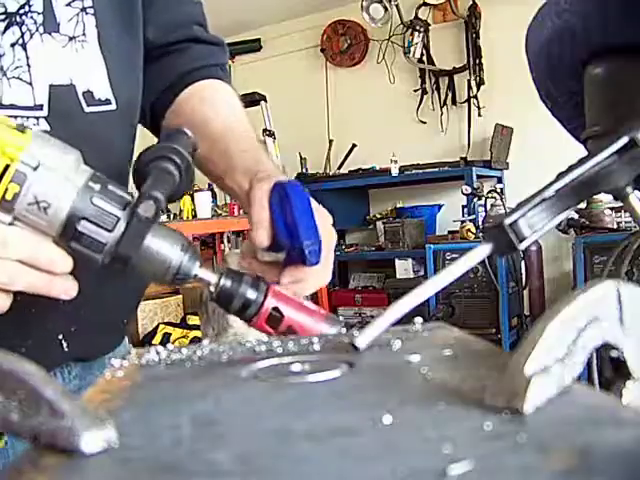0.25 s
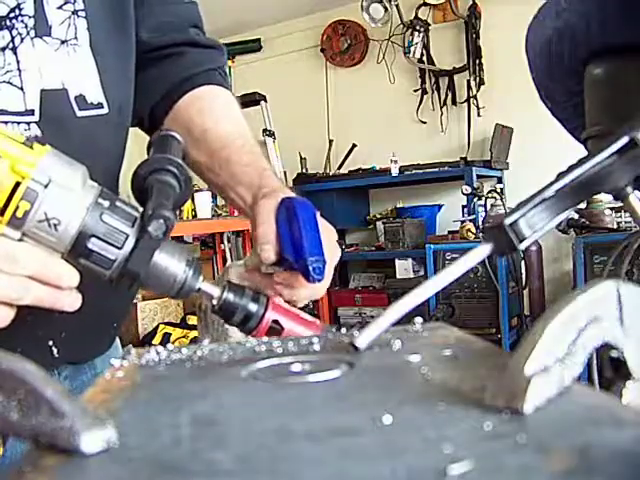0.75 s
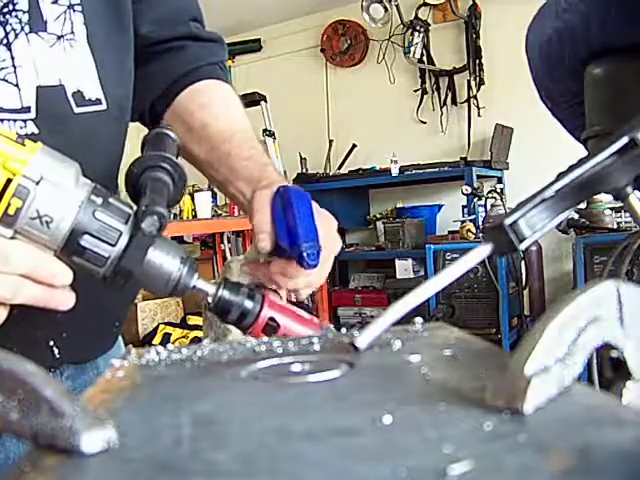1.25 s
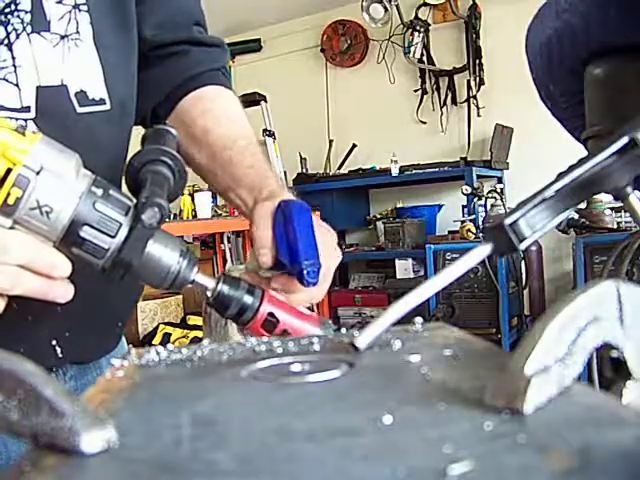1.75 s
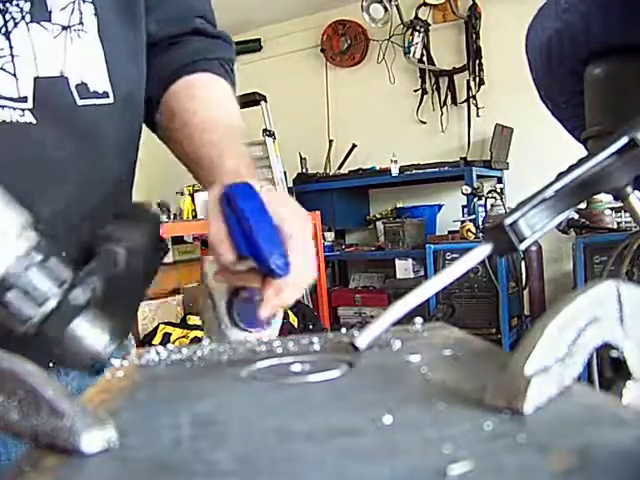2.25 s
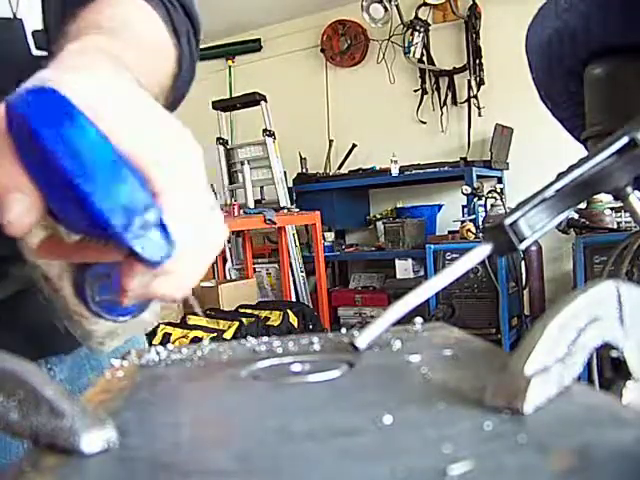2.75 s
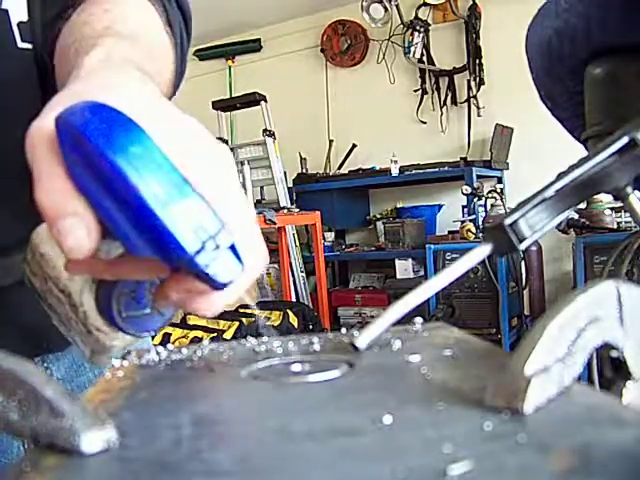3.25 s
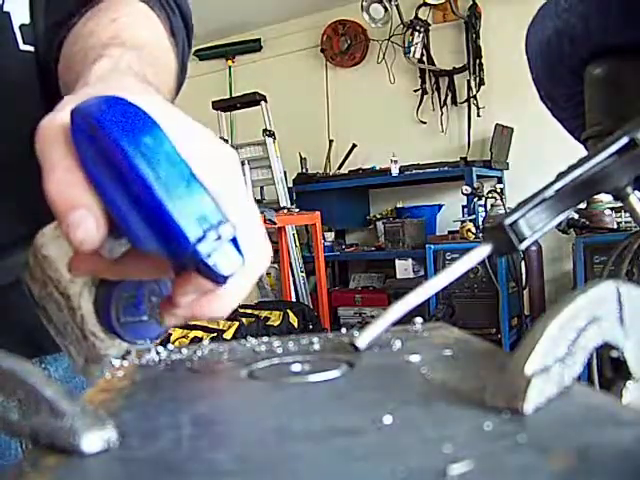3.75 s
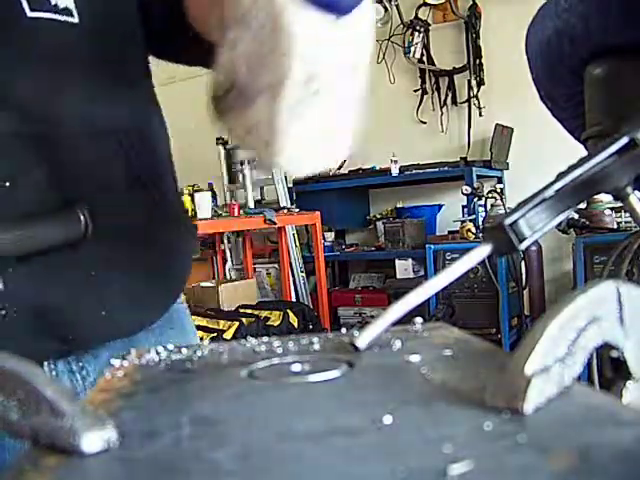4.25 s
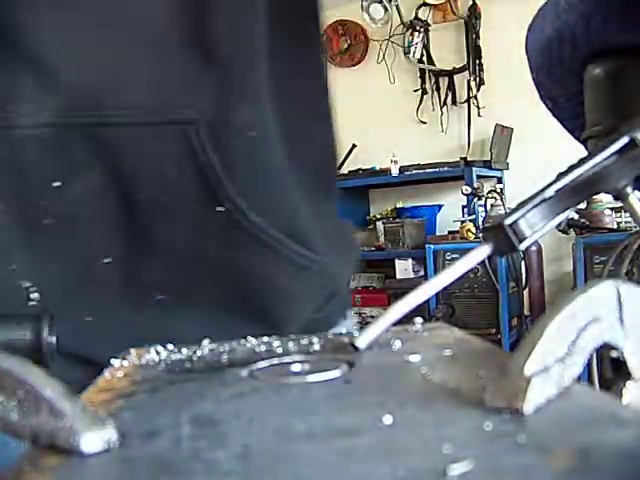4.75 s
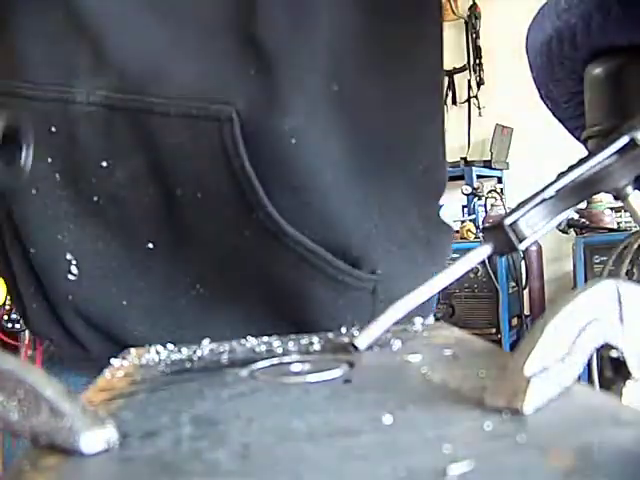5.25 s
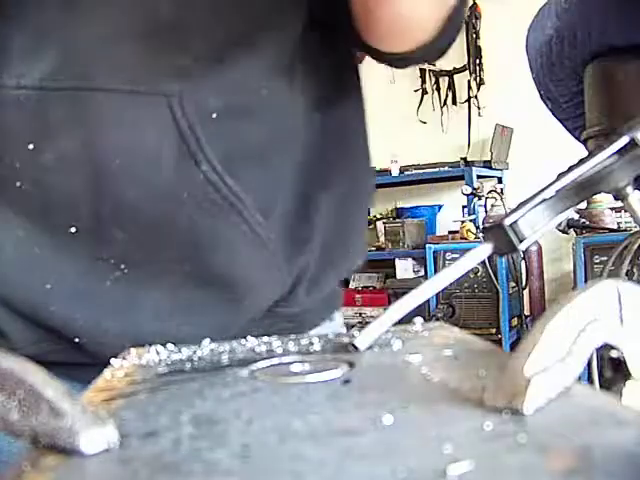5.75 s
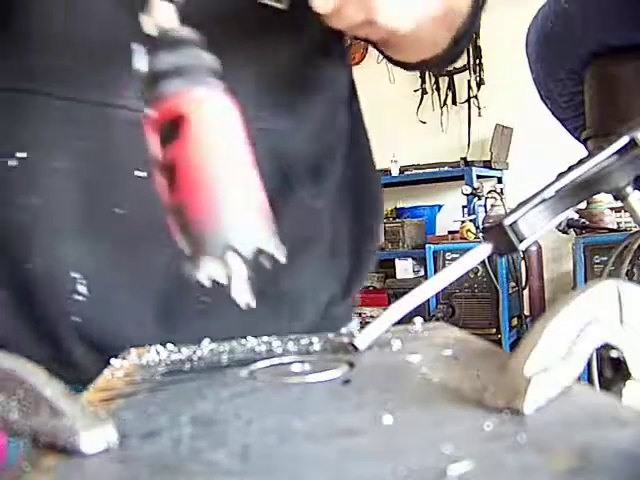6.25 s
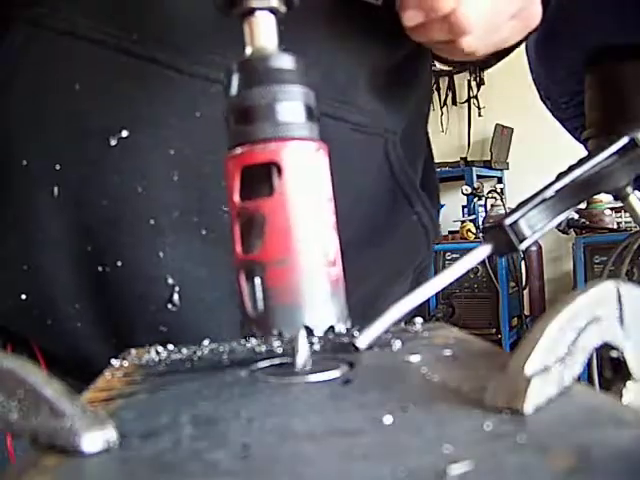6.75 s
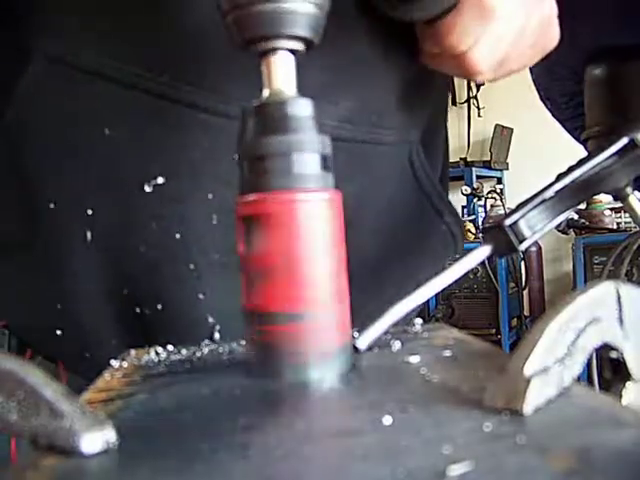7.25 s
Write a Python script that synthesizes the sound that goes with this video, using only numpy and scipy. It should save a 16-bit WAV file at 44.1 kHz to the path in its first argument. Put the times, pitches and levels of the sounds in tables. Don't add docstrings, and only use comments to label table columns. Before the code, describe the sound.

A shrill, whistling jet of compressed air blows continuously right beside a small microphone, harsh and overloaded. Behind it a piston compressor throbs low and fast. The hiss changes colour slightly as a hand and body move near. Small digital ticks pop occasionally. In the last half second a hole saw scrapes, its gears whine up and its teeth grind into steel plate.

```python
import sys
import numpy as np
from scipy import signal
from scipy.fft import rfft, irfft
from scipy.io import wavfile

SR = 44100
rng = np.random.default_rng(int(sys.argv[2]) if len(sys.argv) > 2 else 0)


def invert_db(level):
    return 10 ** (np.asarray(level, dtype=float) / 20)


def dump(signal):
    limited = np.clip(np.atleast_2d(signal).T, -1, 1)
    pcm = np.round(limited * 32767).astype(np.int16)
    wavfile.write(sys.argv[1], SR, pcm)


N = 330750
SLIP_AT_S, SLIP_S = 3.3752, .0017


def jet():
    # centre_hz, width_hz
    jet_bands = [
        (7214, 500),
        (5317, 635),
        (6270, 640),
        (7684, 414),
    ]
    jet_level_db = [-18.5, -25.5, -21.5, -19]
    flutter_db = [0.32, .5, 0.4, 0.46]
    # comes_s, fully_there_s, starts_to_leave_s, gone_s
    body_leans = (5.3, 6.2, 6.35, 6.55)
    # comes_s, fully_there_s, starts_to_leave_s, gone_s
    teeth_block = (7.145, 7.166, 7.172, 7.2)

    moving_hand = presence(2.72, 2.9, 2.95, 3.05) + presence(3.84, 3.9, 3.94, 4.048)
    still_hand = presence(2.98, 3.2, 3.84, 3.9)
    hovering_saw = presence(6.68, 6.98, 7.06, 7.11)
    landing_saw = presence(7.04, 7.1, 7.112, 7.128)
    seated_saw = presence(7.1, 7.122, 8, 9)
    shading = [
        (moving_hand, (-2, -1.7, 2.5, -0.5)),
        (still_hand, (3.5, 0.7, -2.2, 0.3)),
        (presence(*body_leans), (1.5, 0.4, -0.6, -0.8)),
        (hovering_saw, (-10, -11.5, 2, 1)),
        (landing_saw, (2, 2, -2, 2.5)),
        (seated_saw, (-3, -4.5, -2.5, 0.4)),
        (presence(*teeth_block), (-1.5, -1.5, -3.5, -1.5)),
    ]
    skirt_shift_hz = 300 * hovering_saw
    shoulder_shift_hz = 121 * (moving_hand + still_hand) - 200 * hovering_saw
    shifts_hz = [0, skirt_shift_hz, shoulder_shift_hz, 0]
    chop_db = 1 * seated_saw * drift(25.0)

    out = 0
    for k, (hz, width_hz) in enumerate(jet_bands):
        band = wandering_band(hz + shifts_hz[k], 1.68 * width_hz)
        level_db = jet_level_db[k] + sum(share * effect_db[k] for share, effect_db in shading)
        out = out + invert_db(level_db + chop_db + flutter_db[k] * drift(90.0)) * band
    return invert_db(3.5) * out


def wandering_band(hz, width_hz):
    r = np.exp(-np.pi * width_hz / SR)
    noise = rng.standard_normal(N) + 1j * rng.standard_normal(N)
    phasor = signal.lfilter([1], [1, -2 * r, r * r], noise)
    carrier = np.exp(2j * np.pi * np.cumsum(hz + np.zeros(N)) / SR)
    return rms_one(np.real(phasor * carrier))


def presence(comes_s, there_s, leaves_s, gone_s):
    return np.interp(np.arange(N) / SR, [comes_s, there_s, leaves_s, gone_s], [0, 1, 1, 0])


def overload(x, top, knee):
    return top * np.tanh(np.abs(x / top) ** knee) ** (1 / knee) * np.sign(x)


def drill():
    return gear_whine() + saw_teeth()


def gear_whine():
    trigger_s, turn_s = 7.187, .105
    t = np.arange(N) / SR
    speed = 1 - np.exp(-np.maximum(t - trigger_s, 0) / .013)
    wobble = np.cos(2 * np.pi * (t - 7.405) / turn_s)
    wobble = wobble * np.clip((t - trigger_s) / turn_s, 0, 1) ** 4
    hz = 3070 * speed + 42 * wobble
    strain_db = 30 * (1 - speed)
    level_db = -38 + strain_db + 1.5 * wobble + 1.2 * drift(30.0)
    tone = np.sqrt(2) * np.sin(2 * np.pi * np.cumsum(hz) / SR)
    return (speed > .87) * invert_db(level_db) * tone


def saw_teeth():
    # centre_hz, width_hz, level_db
    cup_modes = [(900, 350, -11), (1500, 400, -7), (1900, 350, -3), (2350, 450, 0), (2750, 400, -1),
                 (3600, 300, -3)]
    # middle_s, level_db, length_in_bites
    bites = [
        (7.085, -39, 2),
        (7.179, -29.5, .4),
        (7.275, -30.5, 1.7),
        (7.36, -34, .5),
        (7.415, -28.5, 1),
        (7.478, -29.5, .8),
    ]
    touch_s, bite_s = 7.17, .022
    t = np.arange(N) / SR
    sizes = invert_db(1.7 * np.minimum(rng.exponential(1, N), 4)) * rng.choice([-1, 1], N)
    clicks = sizes * (rng.random(N) < 2500 / SR)
    ring = 0
    for k, (hz, width_hz, level_db) in enumerate(cup_modes):
        ring = ring + invert_db(level_db) * (-1) ** k * rms_one(resonate(clicks, hz, width_hz))
    power = invert_db(2 * -37.5) * np.clip((t - touch_s) / bite_s, 0, 1)
    for middle_s, level_db, length in bites:
        power = power + invert_db(2 * level_db) * np.exp(-((t - middle_s) / (length * bite_s)) ** 2)
    return np.sqrt(power) * rms_one(ring)


def resonate(x, hz, width_hz):
    r = np.exp(-np.pi * width_hz / SR)
    return signal.lfilter([(1 - r * r) / 2, 0, (r * r - 1) / 2],
                          [1, -2 * r * np.cos(2 * np.pi * hz / SR), r * r], x)


def compressor():
    # multiple_of_stroke_rate, level_db
    stroke_tones = [(1, -7.5), (2, -1.5), (3, -14), (4, -19), (5, 3), (6, -4), (7, -20), (8, -3), (9, -8),
                    (10, -14), (11, -0.5), (12, 1.5), (13, 1), (14, -6), (15, 2.5), (16, -2), (17, -6.5),
                    (18, -23.5), (19, -13), (20, -11)]
    stroke_hz, knock_at = 56.36, .223
    t = np.arange(N) / SR
    heard_t = t - SLIP_S * (t > SLIP_AT_S)
    turn = 2 * np.pi * (stroke_hz * heard_t - knock_at)
    room_db = np.interp(t, [2.2, 3.4], [-3, 1])
    out = 0
    for k, level_db in stroke_tones:
        waver = invert_db(1.1 * drift(1.5)) * (-1 if k in (5, 6) else 1)
        smear = .35 * drift(.6) + .6 * np.sin(k * k)
        gain = invert_db(-48 + level_db + room_db * (k in (14, 15)))
        out = out + gain * waver * np.sqrt(2) * np.cos(k * turn - .5 + smear)
    return out


def rush():
    # frequency_hz, density_db (per Hz)
    rush_spectrum = [(15, 4), (60, -2.5), (200, -1), (700, -1), (1500, -0.5), (2900, 0.5), (3350, -1),
                     (3800, 3), (4600, -6.5), (6000, -31.5)]
    grain = invert_db(1.0 * drift(400.0))
    return invert_db(-31.5) * rms_one(colour(rng.standard_normal(N) * grain, rush_spectrum))


def rms_one(x):
    return x / np.sqrt(np.mean(x ** 2) + 1e-20)


def drift(rate_hz):
    r = np.exp(-2 * np.pi * rate_hz / SR)
    settled = signal.lfilter([1], [1, -2 * r, r * r], rng.standard_normal(N + SR))[SR:]
    return rms_one(settled)


def colour(x, points):
    hz, level_db = np.transpose(points)
    bins_hz = np.arange(N // 2 + 1) * SR / N + 1
    return irfft(rfft(x) * invert_db(np.interp(np.log(bins_hz), np.log(hz), level_db)), N)


def scene():
    mix = overload(jet(), top=0.47, knee=2.3) + rush() + compressor() + drill()
    return np.tile(mix, (2, 1))


def dip(x):
    for sharpness in (1.82, 14.3):
        x = x - 0.81 * signal.lfilter(*signal.iirpeak(4200, sharpness, fs=SR), x)
    return x


def add_ticks(x):
    # at_s, tick_height, lead_in_swing (0-1)
    ticks = [
        (.8838, .15, 1.0),
        (2.3761, -.14, .6),
        (3.3752, .2, .3),
        (3.8532, -.28, .35),
        (4.3621, -.13, .7),
        (4.8617, -.14, .7),
        (5.8554, .07, .5),
        (6.3548, -.1, .8),
        (7.0943, .1, 1.0),
    ]
    blip = 2 * np.hanning(7)[1:-1]
    for at_s, height, swing in ticks:
        at = round(at_s * SR)
        x[at - 7:at + 3] += height * np.append(-swing * blip, blip)
    return x


def mirror_top(x):
    spectrum, fold = rfft(x), round(8000 * N / SR)
    spectrum[fold:2 * fold] = -np.conj(spectrum[fold:0:-1])
    return irfft(spectrum, N)


def channel_splits():
    # middle_s, level_db, low_hz, high_hz
    splits = [
        (2.945, -23, 5540, 6950),
        (3.34, -30, 4860, 5800),
    ]
    t = np.arange(N) / SR
    side = np.zeros(N)
    for middle_s, level_db, low_hz, high_hz in splits:
        swell = np.cos(np.pi * np.clip((t - middle_s) / .046, -.5, .5))
        edges_hz = [.95 * low_hz, 1.05 * high_hz]
        band_pass = signal.cheby2(8, 80, edges_hz, "band", fs=SR, output="sos")
        side += invert_db(level_db) * swell * rms_one(signal.sosfilt(band_pass, rng.standard_normal(N)))
    return side


def roll_off(x):
    return signal.sosfilt(signal.butter(12, 9180, fs=SR, output="sos"), x)


def record(dry):
    # frequency_hz, level_db
    top_response = [(10, 0), (7000, 0), (7500, -1), (8000, -6), (8500, -16.5), (8900, -33), (9000, -41),
                    (9200, -59), (9400, -80), (22100, -120)]
    x = add_ticks(dip(dry[0]))
    x = colour(mirror_top(x), top_response)
    side = channel_splits()
    return roll_off(np.array([x + side, x - side]))


dry = scene()
out = record(dry)
dump(out)
```